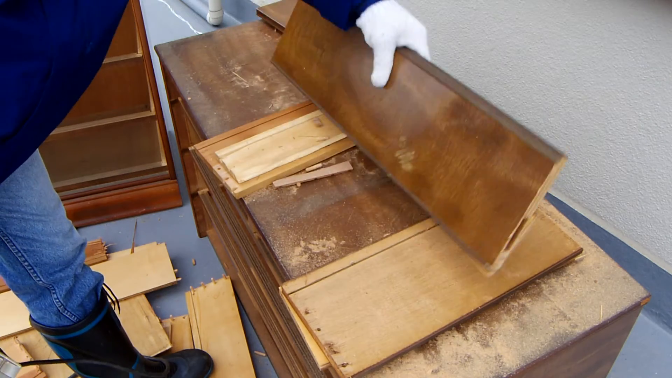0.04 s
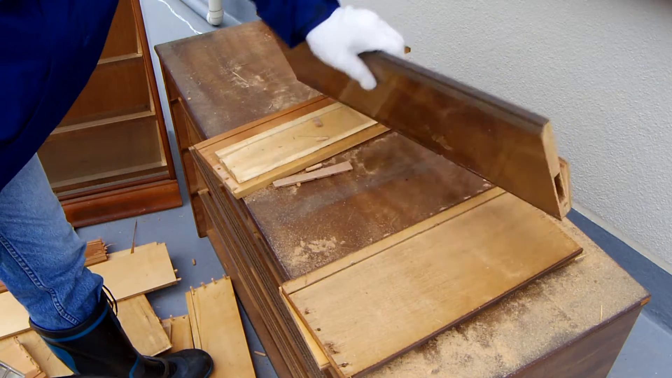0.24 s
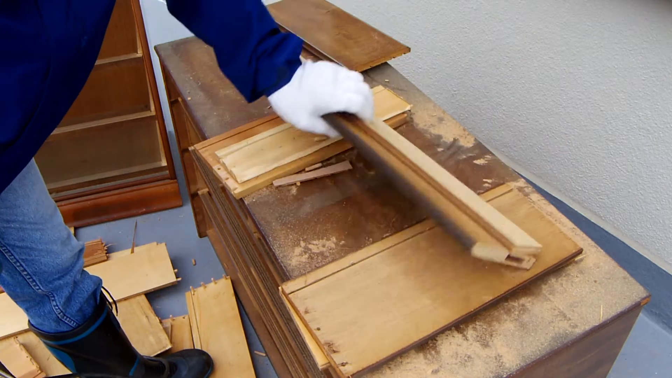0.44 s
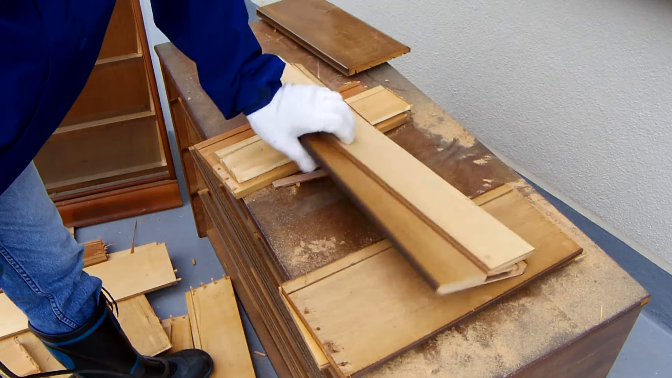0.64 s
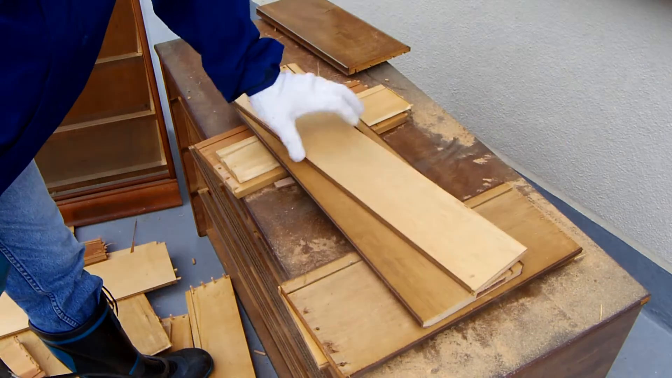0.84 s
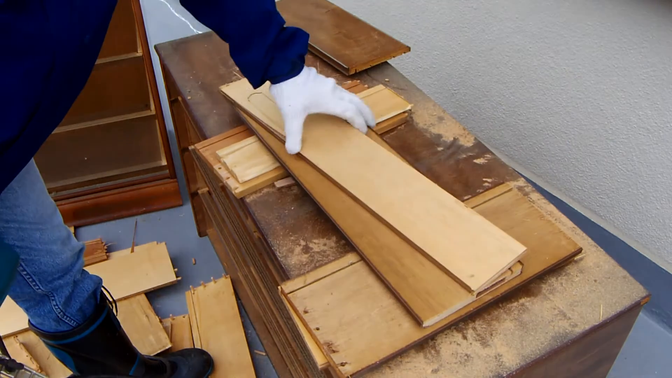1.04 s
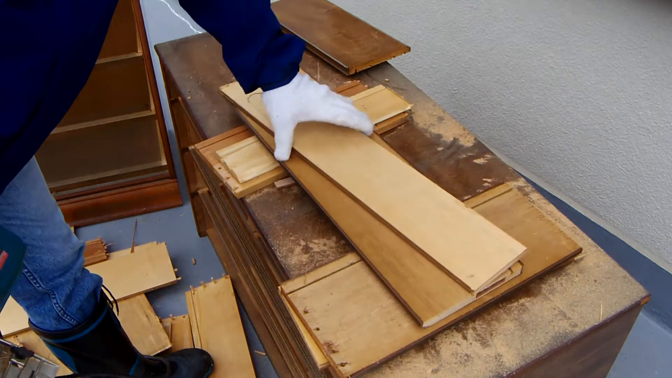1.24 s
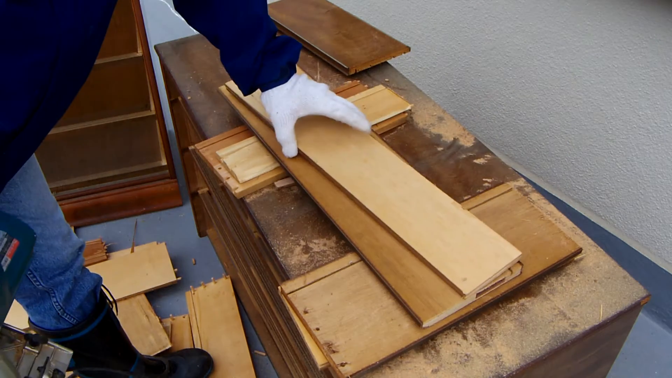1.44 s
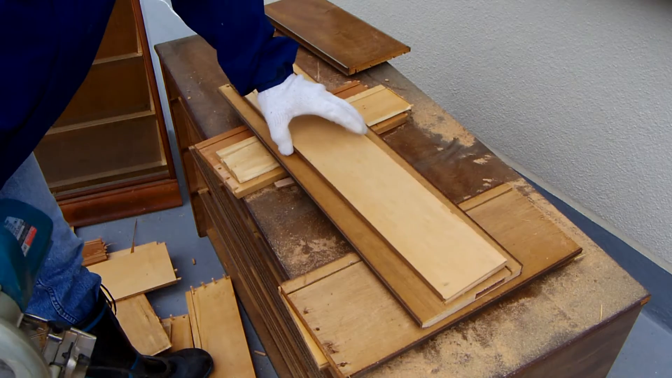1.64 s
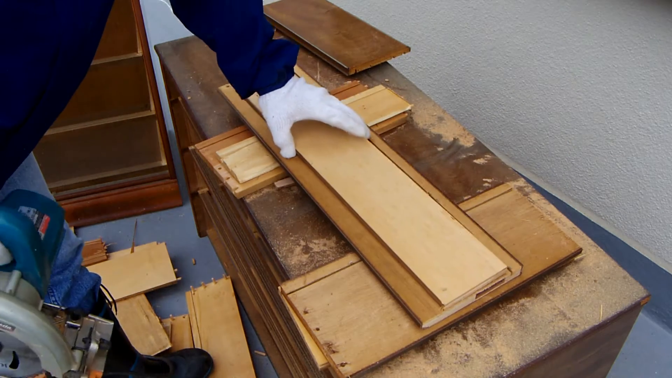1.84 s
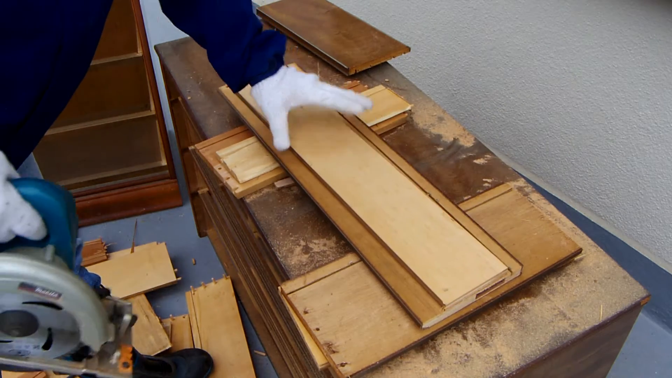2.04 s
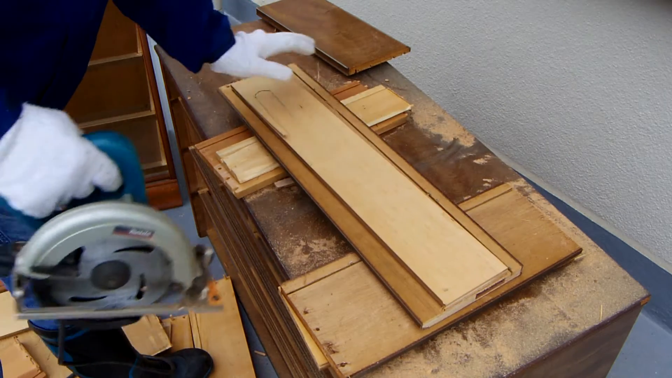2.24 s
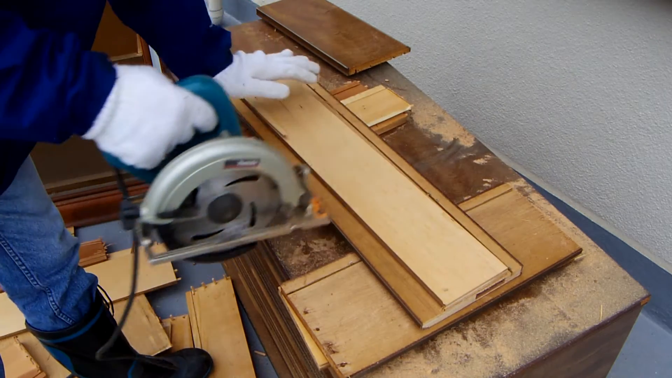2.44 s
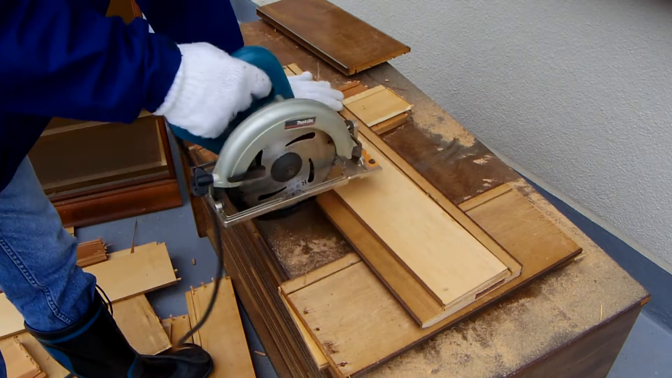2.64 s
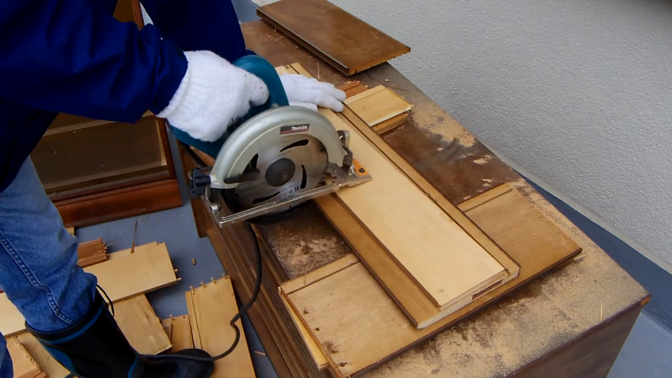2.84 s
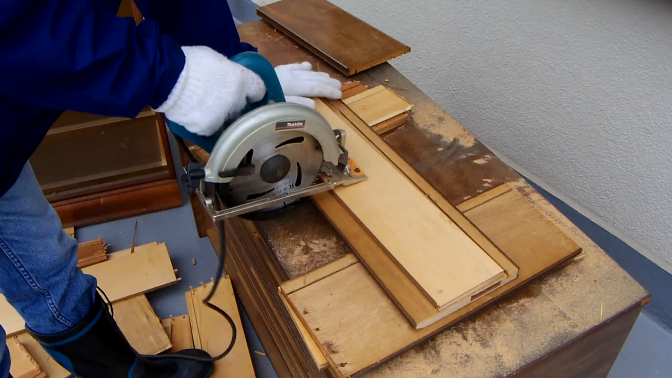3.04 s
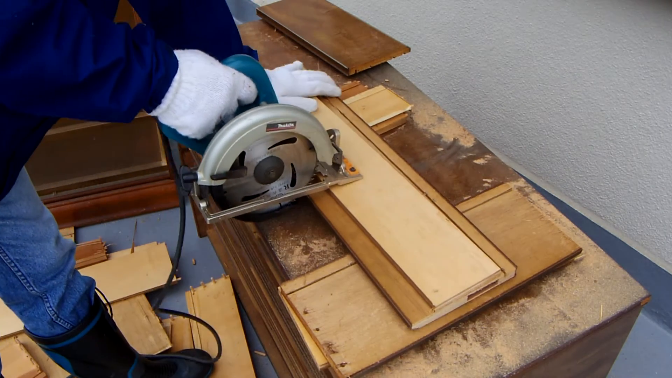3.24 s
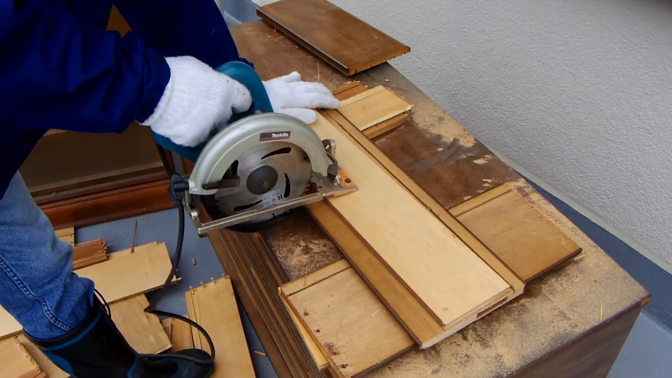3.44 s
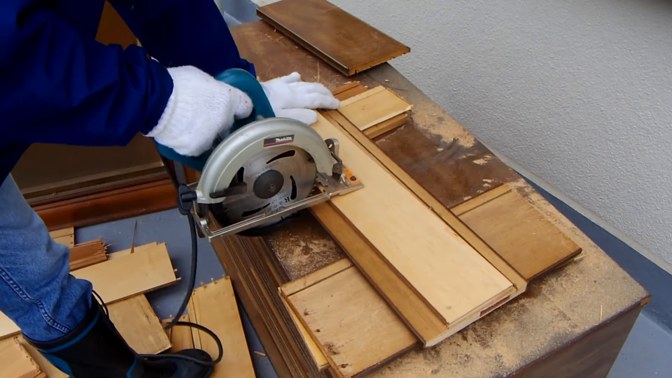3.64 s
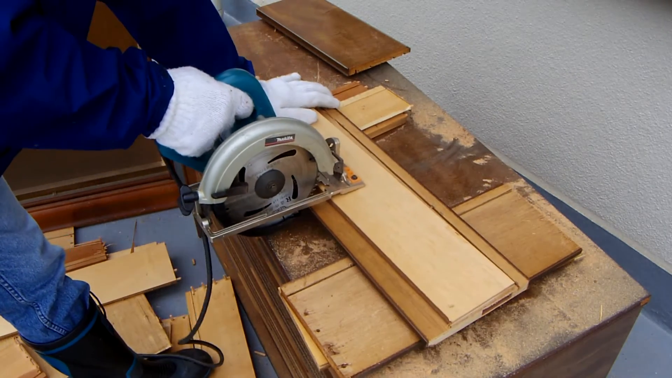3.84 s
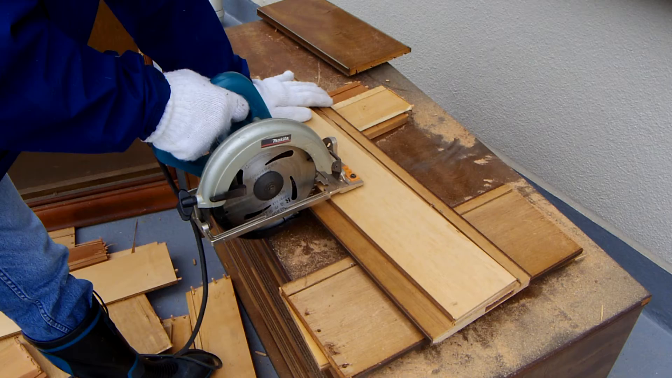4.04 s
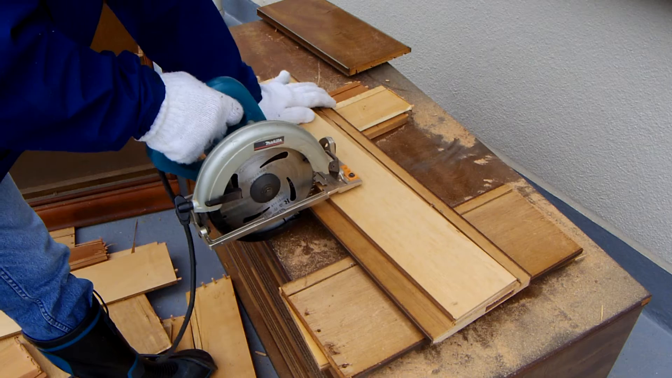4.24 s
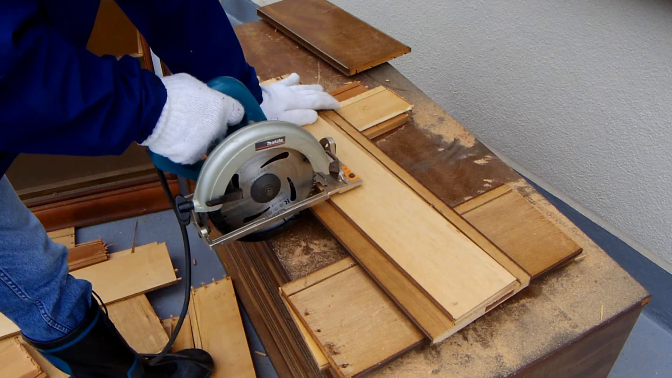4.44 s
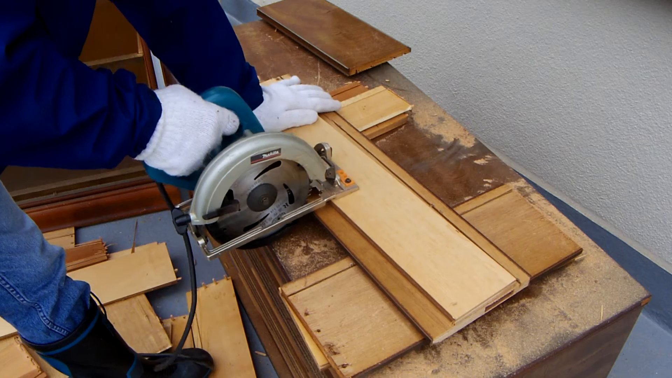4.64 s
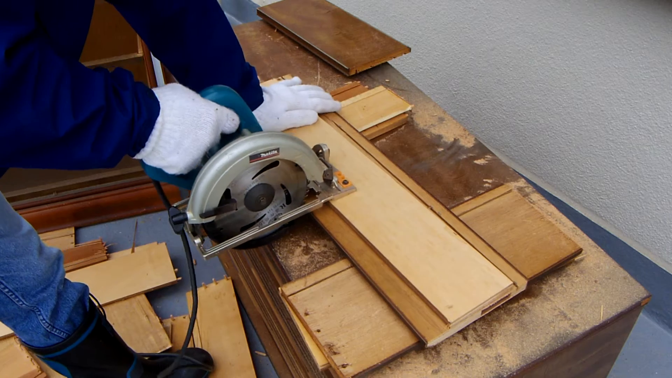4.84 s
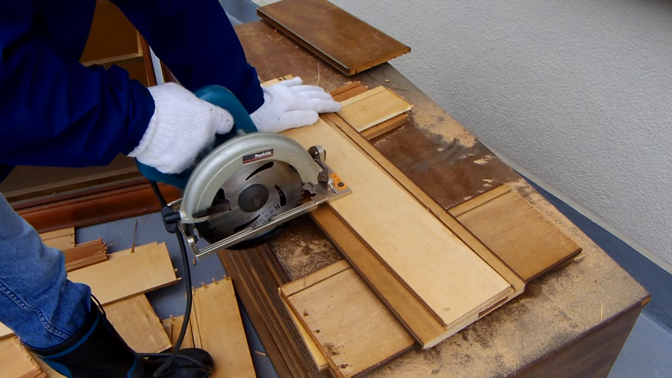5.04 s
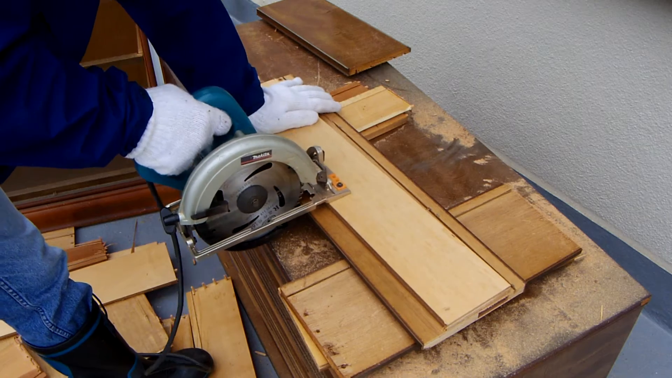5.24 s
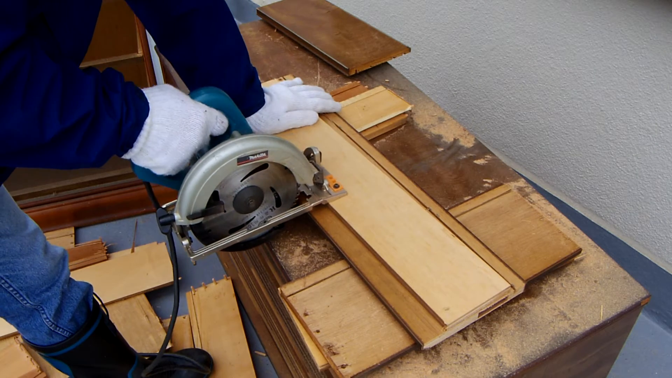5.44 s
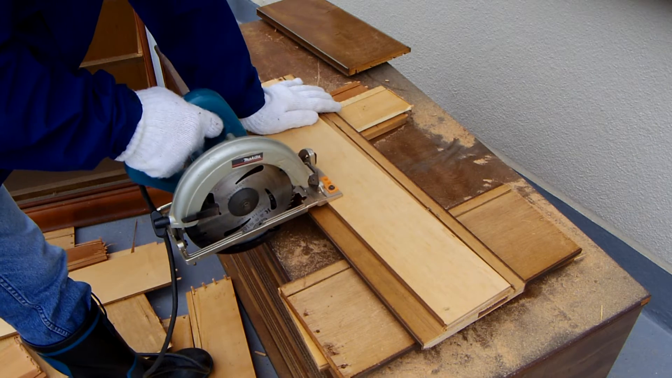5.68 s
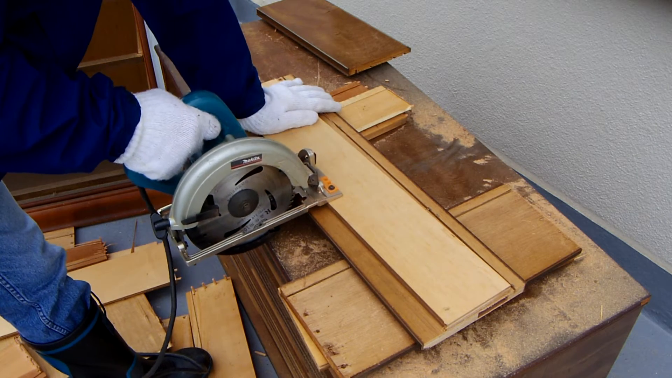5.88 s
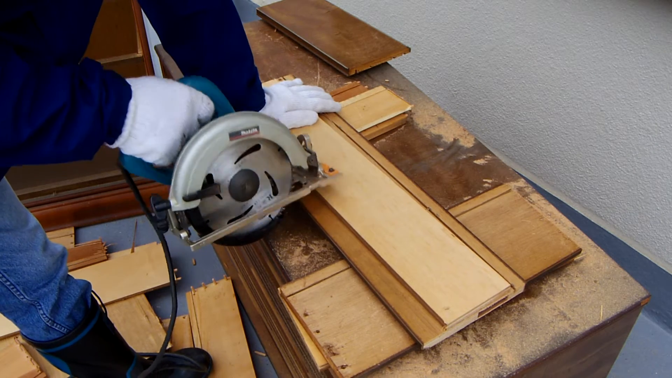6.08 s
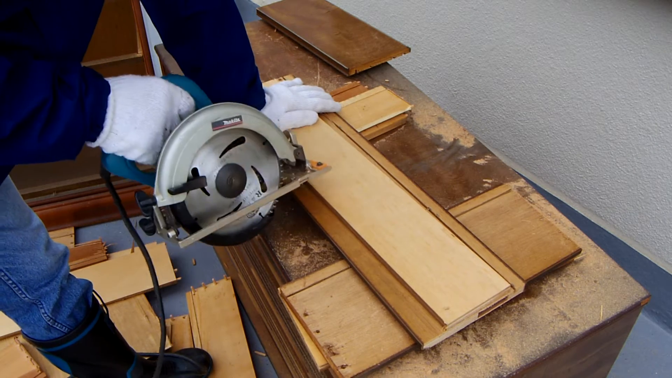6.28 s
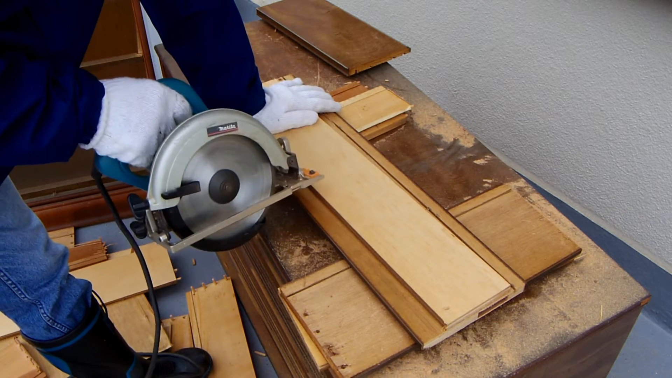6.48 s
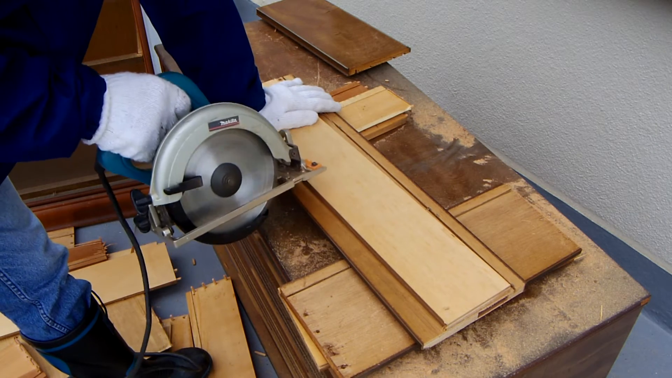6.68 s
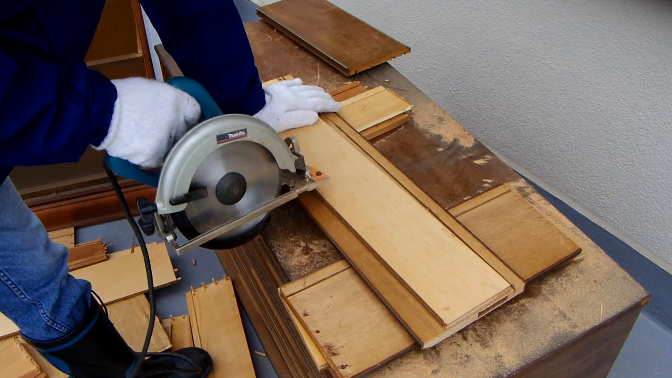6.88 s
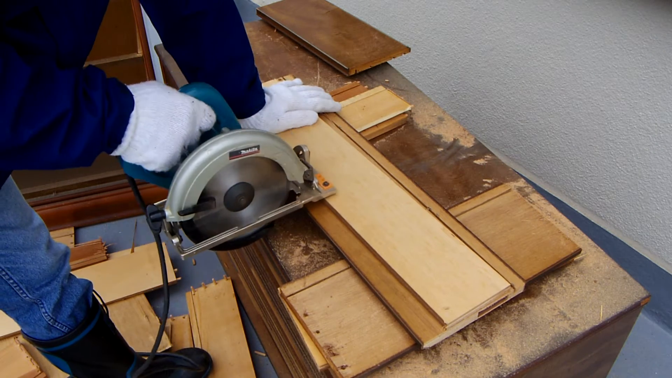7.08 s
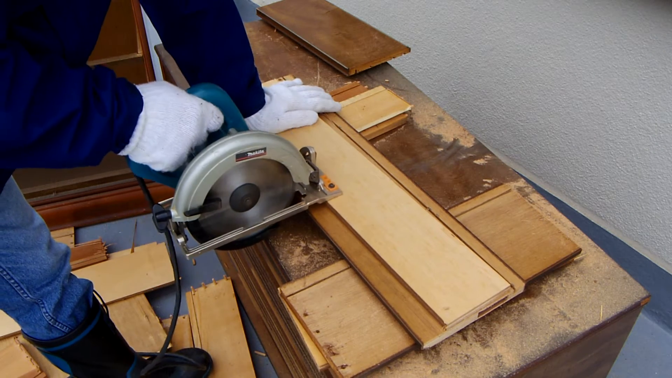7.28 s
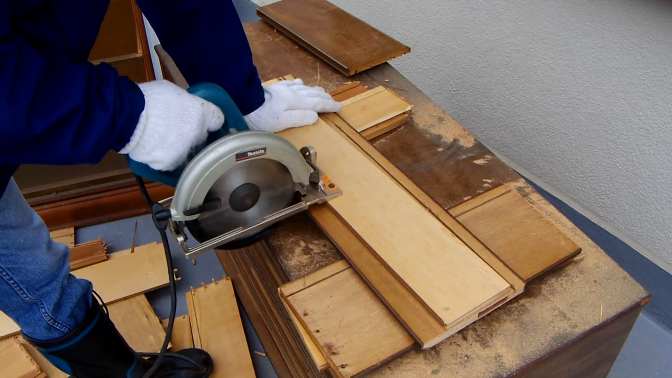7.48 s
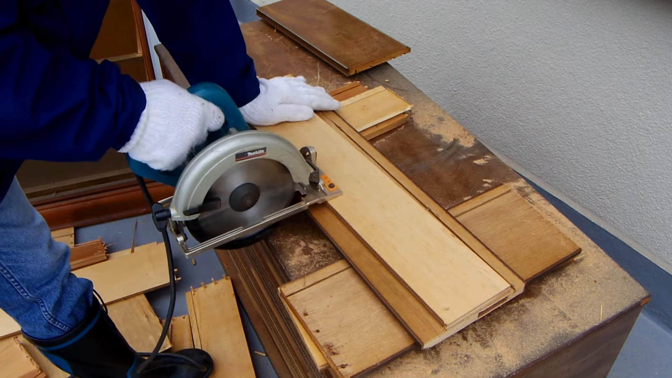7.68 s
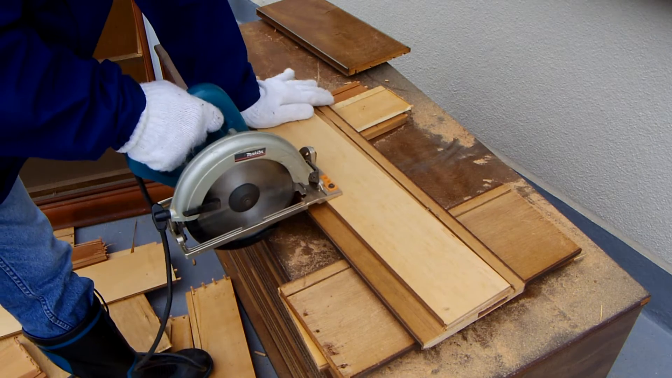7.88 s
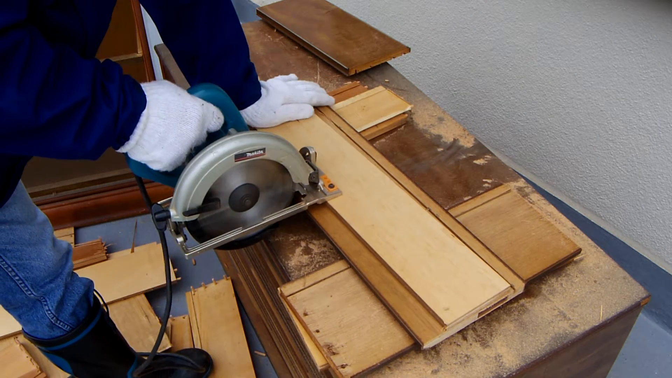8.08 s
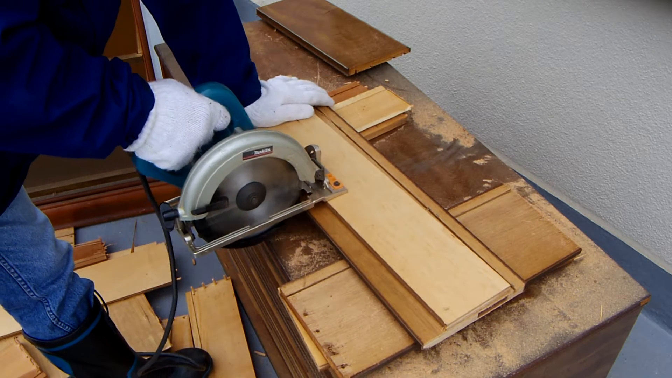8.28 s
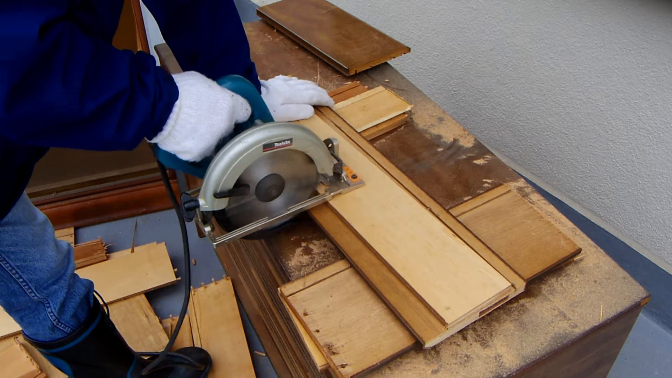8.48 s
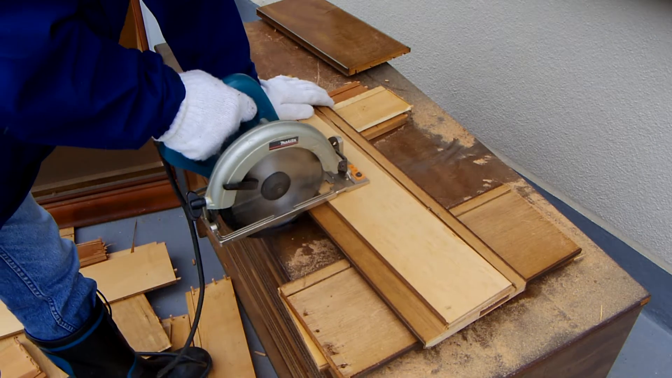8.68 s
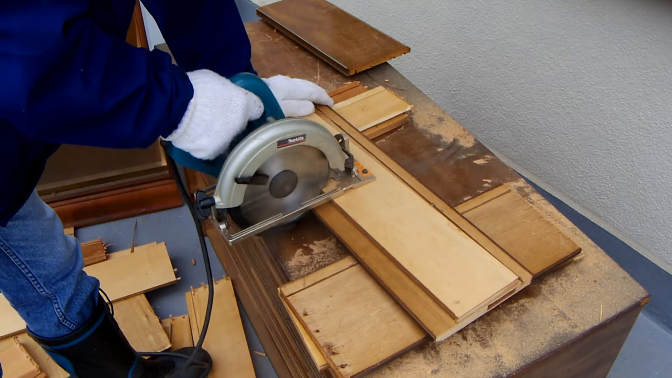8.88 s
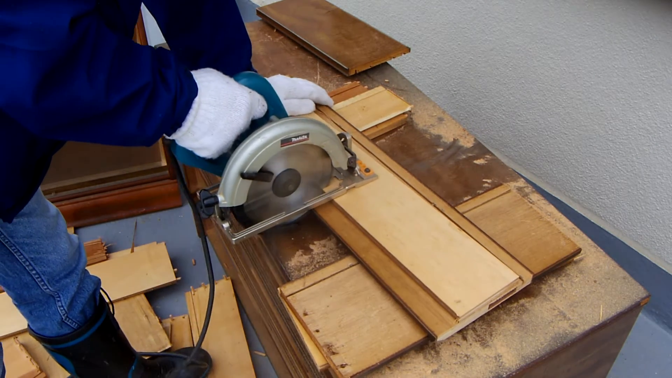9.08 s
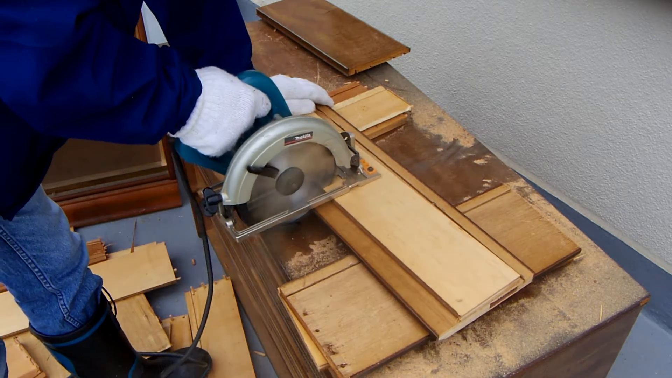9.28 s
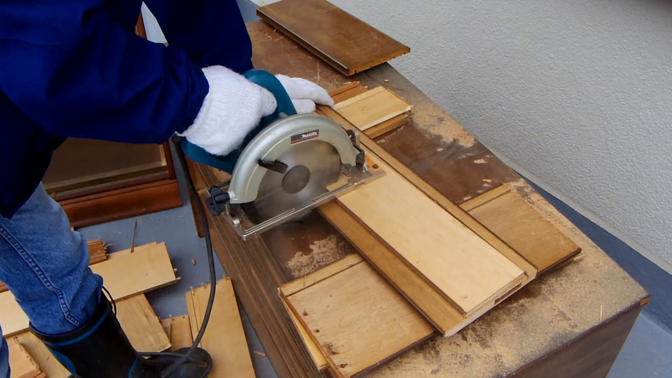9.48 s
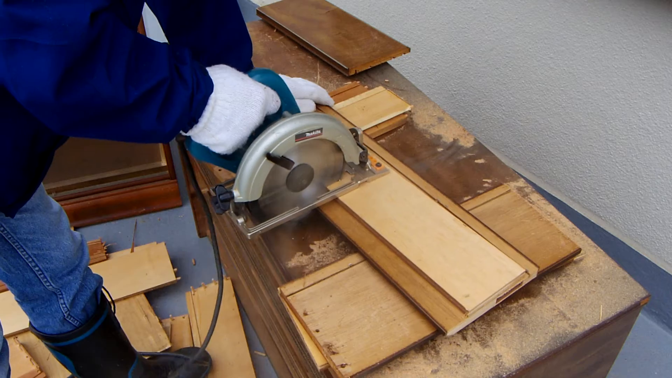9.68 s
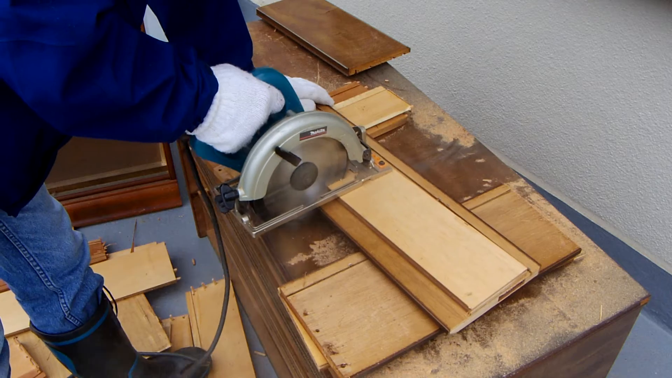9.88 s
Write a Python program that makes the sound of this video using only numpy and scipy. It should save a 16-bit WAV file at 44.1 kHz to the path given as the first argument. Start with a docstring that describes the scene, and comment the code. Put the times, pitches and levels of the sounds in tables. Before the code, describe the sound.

Close by, wood clatters on wood as a board is put down, followed by small taps, brief slides and the clicks of a saw's metal base. Faint traffic and an engine hum come from outside. After a pause, an electric circular saw is briefly triggered, then held, whining up to speed. Its teeth tear into the wood, hissing and buzzing as the blade slows under load. Nearby hard walls add a short echo.

```python
"""Over faint traffic, an engine outside slows down, its exhaust pulses blurred into a hum. A board is
turned over and laid on a wooden cabinet, each impact exciting its modes. Near 3 s the engine pulls away,
while the board and then a hand-held circular saw are slid into place. At 6.5 s the saw is blipped, then
spins up with fan noise and a gear whine tied to its rotation. At 8.5 s its teeth bite, tearing fibres
and ringing the blade, which slows under the load. Hard walls close by add a short echo."""
import sys
import numpy as np
from scipy import signal
from scipy.fft import rfft, irfft
from scipy.io import wavfile

SR = 44100
rng = np.random.default_rng(int(sys.argv[2]) if len(sys.argv) > 2 else 0)


def store_wav(level_fs):
    """Save 16-bit WAV to argv[1]."""
    pcm = np.round(np.clip(np.atleast_2d(level_fs), -1, 1) * 32767)
    wavfile.write(sys.argv[1], SR, pcm.T.astype(np.int16))


N = 437472
T = np.arange(N) / SR
SIDES = np.array([[1], [-1]])  # left, right


def undb(db):
    """Decibels to amplitude ratio."""
    return 10 ** (np.asarray(db) / 20)


def unit(x):
    """Normalisation to rms 1."""
    return x / np.sqrt(np.mean(x ** 2) + 1e-20)


def noise():
    """White Gaussian noise."""
    return rng.standard_normal(N)


def walk(rate):
    """Random modulation of rms 1, with rate new values a second."""
    steps = rng.standard_normal(int(N / SR * rate) + 2)
    return unit(np.interp(T * rate, np.arange(len(steps)), steps))


def sine(cycles):
    """Simple harmonic motion, its phase in cycles."""
    return np.sin(2 * np.pi * cycles)


def curve(points):
    """Linear interpolation of (seconds, value) points at every sample."""
    return np.interp(T, *np.transpose(points))


def onset(start, rise):
    """A linear ramp from 0 to 1, its times in seconds."""
    return np.clip((T - start) / rise, 0, 1)


def along(points, hz):
    """Interpolation of (Hz, value) points on a log-frequency axis."""
    f, value = np.transpose(points)
    return np.interp(np.log(hz + 1), np.log(f), value)


def bins(size):
    """Frequencies of a real Fourier transform."""
    return np.arange(size // 2 + 1) * SR / size


def colour(x, points):
    """Spectral shaping to rms 1, with a steep roll-off beyond the end points."""
    hz = bins(len(x)) + 1
    ends = 1 / np.sqrt((1 + (.8 * points[0][0] / hz) ** 8) * (1 + (.85 * hz / points[-1][0]) ** 12))
    return unit(irfft(rfft(x) * undb(along(points, hz)) * ends, len(x)))


def split(x, hz):
    """A crossover: the parts of x below and above hz."""
    low = signal.sosfiltfilt(signal.butter(4, hz, fs=SR, output="sos"), x)
    return low, x - low


def resonate(x, hz, width):
    """A second-order resonance with gain 1 at its centre."""
    return signal.lfilter(*signal.iirpeak(min(hz, SR / 2 - 100), hz / width, fs=SR), x)


def room(x, wet_db, t60):
    """Reverberation: direct sound plus dense reflections, different at each ear."""
    t = T[:SR // 2]
    decay = undb(-60 * t / t60) + undb(-16.5 - 60 * t / .34)
    tails = rng.standard_normal((2, len(t))) * decay * (t > .002)
    tails /= np.sqrt(np.sum(tails ** 2, axis=1, keepdims=True))
    return x + undb(wet_db) * signal.fftconvolve(x[None], tails, axes=1)[:, :N]


# Spectrum of the background. Each row: frequency in Hz, relative level in dB.
AIR_SPECTRUM = [(180, -23), (300, -1), (502, -9), (842, -5.5), (930, -4), (1030, -7.5), (1750, -12),
                (2610, -18), (7950, -26), (14000, -28.5), (16000, -52)]


def air():
    """Far traffic and hiss form a diffuse field, less coherent between the ears in the treble."""
    mid, side = (colour(noise() * undb(.23 * walk(1.55)), AIR_SPECTRUM) for _ in range(2))
    gain = undb(-68) / np.std(split(mid, 690)[1])
    low, high = split(side, 1600)
    return gain * (mid + SIDES * (.53 * low + 1.12 * high)) * undb(SIDES * -.7)


# Exhaust spectra, throttle shut and open. Each row: frequency in Hz, relative level in dB.
EXHAUST_SPECTRUM = [(25, -7.5), (48, -0.5), (70, 0), (100, -10), (135, -1.5), (175, 0.5), (205, 0),
                    (240, -7), (290, -8), (350, -13), (430, -9.5), (520, -21)]
OPEN_EXHAUST_SPECTRUM = [(100, -13), (150, -8), (200, 4.5), (240, 2.5), (285, -8), (350, -13), (450, -16)]


def exhaust(firings, coasting, pulling):
    """A pulse train gives a harmonic series, here in three rising bands: throb, drone and bark."""
    count = np.floor(np.maximum(firings + .005 * walk(40), 0))
    pulses = unit(np.diff(count, prepend=0) * undb(1.2 * walk(25)))
    pulses = unit(room(pulses, wet_db=2, t60=.07)[0])  # the street smears them into a hum
    low, bark = split(colour(pulses + undb(-9) * noise(), EXHAUST_SPECTRUM), 105)
    throb, drone = split(low, 57)
    open_bark = colour(pulses + undb(-10) * noise(), OPEN_EXHAUST_SPECTRUM)
    bark = unit(bark) * (1 - pulling) + open_bark * pulling
    # each band wavers independently on its way indoors
    lower, rest = split(bark, 185)
    middle, upper = split(rest, 260)
    bark = sum(band * undb(1.7 * walk(9) - .4) for band in (lower, middle))
    return throb, drone, bark + upper * (1 - .4 * coasting) * undb(walk(9))


# Engine speed. Each row: time in seconds, firing rate in Hz.
FIRING_RATE = [(0.0, 40.9), (0.3, 39.7), (1.1, 33.1), (1.6, 31.8), (2.24, 28.0), (2.98, 21.4), (3.17, 23.4),
               (3.4, 29.2), (3.5, 29.6), (4.05, 29.7), (4.22, 30.8), (4.36, 32), (4.96, 34.7), (6.24, 41.9),
               (6.66, 37.7), (8.45, 47.2), (8.76, 47.0), (9.06, 42.2), (9.92, 45.8)]


def engine():
    """The firing rate sets the fundamental and the throttle the level: coasting, pulling, easing off."""
    hz = curve(FIRING_RATE)
    firings = np.cumsum(hz * (1 + .004 * walk(20))) / SR
    pull_s, ease_s = 2.88, 4.24
    opened, eased = onset(pull_s, .45), onset(ease_s, .14)
    coasting, pulling = 1 - opened, opened - eased
    octaves = coasting * np.log2(hz / hz[0])  # negative as the revs sink
    throb, drone, bark = exhaust(firings, coasting, pulling)
    throb_db = -58.5 * coasting - 54.5 * pulling - 55 * eased + .9 * walk(6.2)
    drone_db = -54.5 * coasting - 56.5 * pulling - 68.5 * eased + .9 * walk(6.2) + 8.4 * octaves
    bark_db = -56 * coasting - 51.5 * pulling - 55 * eased + .9 * walk(6.2) + 10 * octaves
    bark_db -= 1.67 * np.maximum(T - ease_s, 0)  # it draws away
    boom = sine(4 * firings + (.03 - .2 * octaves) * walk(30))  # the exhaust's fourth harmonic
    boom *= coasting * undb(-48.5 + 16.5 * octaves + 2.6 * walk(8.74))
    bass = unit(throb) * undb(throb_db - 2.6 * SIDES) + unit(drone) * undb(drone_db - 1.8 * SIDES)
    return bass + (boom + bark * undb(bark_db) + rattle(firings) * pulling) * undb(SIDES * -1.1)


def impacts(events, spectrum, modes, t60, damping_slope, rise_s, ring_db, gain_db):
    """An impulse excites damped modes over a noisy crack whose treble dies first; t60 holds at 1 kHz."""
    out, t = np.zeros(N + SR), T[:SR // 3]
    hz = bins(len(t))
    for start, db, tilt, pitch in events:
        crack = ring = 0
        for centre in 125 * 2. ** np.arange(8):
            band = np.cos(np.clip(np.log2((hz + 1) / centre), -1, 1) * np.pi / 2)
            gain = band * undb(along(spectrum, hz / pitch) + tilt * np.log2(centre / 1000))
            life = t60 * (centre / 1000) ** -damping_slope
            phases = np.exp(2j * np.pi * rng.random(len(hz)))
            crack += irfft(gain * phases, len(t)) * undb(-60 * t / life)
        for f, mode_db, life in modes:
            envelope = undb(mode_db + tilt * np.log2(f / 1000) - 60 * t / life)
            ring += envelope * sine(f * pitch * t) * rng.choice([-1, 1])
        hit = (unit(crack) + undb(ring_db) * unit(ring)) * np.minimum(t / rise_s, 1)
        i = int(start * SR)
        out[i:i + len(t)] += hit * undb(db + gain_db) / np.std(hit[:SR // 200])
    return out[:N]


# Blows on the board. Each row: start in seconds, relative level in dB, tilt in dB/octave, pitch ratio.
BOARD_KNOCKS = [(0.0988, -32.5, 6.5, 0.89), (0.387, -38, -2.5, 1), (0.401, -44, 7, 1.06),
                (0.476, -35.5, 0, 1.1), (0.496, -36, 0.5, 1.54), (0.575, -16, 0, 1.54),
                (0.578, -13.5, 2, 0.96), (0.607, -42, 14, 1), (0.625, -46, 12, 1), (0.641, -31, -0.5, 0.94),
                (0.665, -30.5, -4, 1.1), (0.89, -26.5, 2.5, 1.1), (0.897, -9.5, 2, 0.98),
                (0.96, -23.5, 5, 0.77), (0.988, -18.5, 2, 1.01), (1.0424, -51, 7, 0.89), (1.312, -51, 4, 1),
                (1.438, -55.5, 7, 1), (1.656, -52, 4, 1.4), (2.55, -66, 11, 0.9), (2.947, -25.5, 0, 1.74),
                (3.024, -35.5, -0.5, 1), (3.1475, -44, 3, 1), (3.1659, -42.5, 6.5, 0.97),
                (3.192, -54, 0, 1.1), (3.208, -57, 1, 0.92), (3.3204, -45, 4.5, 0.93), (3.545, -45, 2, 1),
                (3.6081, -29.5, 7, 1.08), (3.624, -31, -7, 0.92), (3.743, -43, 3.5, 1.6),
                (3.7599, -43.5, 4.5, 1.3)]
# Spectrum of a knock. Each row: frequency in Hz, relative level in dB.
KNOCK_SPECTRUM = [(59, -35), (100, -6), (147, -11), (277, -13.5), (558, 0), (662, -9), (801, -3.5),
                  (1100, -7), (1350, -10), (1900, -8), (2250, -11), (2990, -21), (4110, -17.5), (4570, -25),
                  (12700, -34), (16000, -51)]
# Modes of the board. Each row: frequency in Hz, relative level in dB, 60 dB decay time in seconds.
WOOD_MODES = [(143, -16, 0.21), (315, -8, 0.37), (490, -11, 0.27), (580, 0.5, 0.12), (784, -15, 0.13),
              (957, -3, 0.069), (1230, -25, 0.12), (1346, -3.5, 0.06), (1635, -4, 0.05), (1964, -11, 0.055),
              (2370, -21, 0.12), (2750, -18, 0.095), (3467, -34, 0.16), (4080, -12, 0.12)]


def board_knocks():
    """Free vibration of struck wood, its pitch depending on the spot struck."""
    return impacts(BOARD_KNOCKS, KNOCK_SPECTRUM, WOOD_MODES,
                   t60=.091, damping_slope=.56, rise_s=.00048, ring_db=-14, gain_db=-10)


# Resonances of thin metal. Each row: frequency in Hz, bandwidth in Hz, relative gain in dB.
THIN_METAL = [(1780, 1600, 11), (2780, 360, -9), (3220, 160, -5), (4300, 200, 7.5), (6370, 300, -2),
              (7260, 900, 0), (11600, 970, -11)]


def thin_metal(force):
    """Modal superposition: thin metal answers a force with the sum of its resonances."""
    return unit(sum(undb(db) * resonate(force, hz, width) for hz, width, db in THIN_METAL))


def rattle(firings):
    """Forced vibration: each firing shakes a burst of ticks out of loose metal."""
    phase = firings % 1
    burst = np.minimum(phase / .15, 1) * np.exp(-phase / .27)
    return thin_metal(noise() * burst * undb(walk(30) + 2.2 * walk(600))) * undb(-68.5)


# Metal clicks. Each row: start in seconds, relative level in dB, tilt in dB/octave, pitch ratio.
SHOE_CLICKS = [(2.9462, -23.5, 3, 0.9), (4.359, -15, 1, 1.01), (4.7551, -29, -1.5, 0.97),
               (4.8224, -37.5, -5.5, 1), (4.8743, -41, -9.5, 1.3)]
# Spectrum of a click. Each row: frequency in Hz, relative level in dB.
CLICK_SPECTRUM = [(350, -35), (600, -21), (2400, -11), (2800, -12), (3730, -8), (4520, -8), (5630, -15),
                  (7620, 1), (8740, -4), (16000, -6.5)]
# Modes of the shoe. Each row: frequency in Hz, relative level in dB, 60 dB decay time in seconds.
METAL_MODES = [(1590, -6, 0.1), (2557, -28, 0.099), (2800, 4, 0.061), (4430, 3, 0.062), (5394, -23, 0.062),
               (6150, 9, 0.025), (6500, -31.5, 0.096), (7300, -44, 0.087), (9281, -41.5, 0.12),
               (10300, -22, 0.049), (10370, 6, 0.044), (14000, -11, 0.046)]


def shoe_clicks():
    """Free vibration of the saw's metal shoe and guard: high, quickly damped modes."""
    return impacts(SHOE_CLICKS, CLICK_SPECTRUM, METAL_MODES,
                   t60=.03, damping_slope=.36, rise_s=.0021, ring_db=-11.5, gain_db=-17)


# Sliding strokes. Each row: start in seconds, end in seconds, relative level in dB.
STROKES = [(3.45, 3.6, -69.5), (3.8, 4.154, -73), (4.94, 5.078, -75.5)]
# Spectrum of rubbing. Each row: frequency in Hz, relative level in dB.
RUB_SPECTRUM = [(880, -34.5), (1500, -22), (1670, -4), (2970, -3), (4420, -5), (11800, -1), (16000, -19)]


def slides():
    """Friction makes gritty noise as the board, then the shoe, slides into place."""
    strokes = sum(undb(db) * (onset(start, .065) - onset(end, .065)) for start, end, db in STROKES)
    grit = noise() * undb(3 * walk(500) + 1.5 * walk(40))
    return (undb(1.5) * colour(grit, RUB_SPECTRUM) + undb(-4) * thin_metal(grit)) * strokes


# The trigger, blipped and then held. Each row: press in seconds, release in seconds.
PRESSES = [(6.498, 6.688), (6.81, 10)]
# The blade under load. Each row: time in seconds, speed in turns per second.
CUTTING_SPEED = [(8.56, 71.6), (8.608, 70.7), (8.71, 66.7), (8.874, 64.9), (9.176, 57.9), (9.378, 56.9),
                 (9.518, 53.4), (9.92, 52.9)]
FREE_SPEED = 72.3  # turns per second
SWITCH_ON_S, BITE_S = PRESSES[0][0], 8.546


def blade_speed():
    """Rotational inertia: the blade nears its free speed gradually; brake or wood drags it down."""
    spin_up_s, brake_s, stall_torque = .472, .12, 1.7
    speed = np.zeros(N)
    for on, off in PRESSES:
        deficit = 1 - np.interp(on, T, speed) / FREE_SPEED
        fade = np.exp(-np.clip(T - on, 0, off - on) / spin_up_s)
        driven = FREE_SPEED * (1 - deficit * fade / (1 + stall_torque * deficit * (1 - fade)))
        speed = np.where(T < on, speed, driven * np.exp(-np.maximum(T - off, 0) / brake_s))
    return np.where(T < BITE_S, speed, curve(CUTTING_SPEED))


# Spectrum of the fan. Each row: frequency in Hz, relative level in dB.
FAN_SPECTRUM = [(88, -64), (150, -68), (275, -7), (391, -18), (555, -7.5), (637, -16.5), (837, -8),
                (1260, -10.5), (2020, -2), (2920, -7), (3220, -4), (4760, -13), (6020, -8), (12900, -9.5),
                (16000, -24.5)]


def fan(revs, current):
    """Turbulence gives broadband noise, its treble weaker near standstill or with the current off."""
    low, high = split(colour(noise(), FAN_SPECTRUM), 7250)
    treble_gain = undb(-1 - 4 * (1 - current)) * np.minimum(revs / .21, 1)
    return unit(low) * undb(-3.5) + unit(high) * treble_gain


def whistle(cycles, order, width_hz):
    """Narrow-band noise: random quadrature modulation of a carrier of phase order * cycles."""
    angle = 2 * np.pi * order * cycles
    return walk(width_hz) * np.cos(angle) + walk(width_hz) * np.sin(angle)


# Air whistles. Each row: order (multiple of blade speed), width in free speeds, relative level in dB.
AIR_WHISTLES = [(29.1, 7, -21), (146, 16, -9), (180, 10, -18)]


def whistling_air(turns):
    """Aerodynamic noise in bands whose pitch is proportional to the blade speed."""
    return sum(undb(db) * whistle(turns, order, width * FREE_SPEED) for order, width, db in AIR_WHISTLES)


# Motor tones that drive the free blade. Each row: order, relative level in dB.
DRIVING_TONES = [(197, -10), (156.7, -2), (117.5, -14), (94, -15)]


def blade_ring(speed):
    """Resonance: the accelerating blade rings softly, and surges as a tone sweeps through its mode."""
    mode_hz, width_hz, catch_hz = 6150, 260, 190
    surge = sum(undb(db) / (1 + ((order * speed - mode_hz) / catch_hz) ** 2)
                for order, db in DRIVING_TONES)
    soft = undb(-11) * np.clip(2 * (1 - speed / FREE_SPEED), 0, 1)
    mode = unit(resonate(resonate(noise(), mode_hz, width_hz), mode_hz, width_hz))
    return (soft + surge) * mode * (1 - onset(7.7, .2))


# Whine tones. Each entry: order; 47 is the gear mesh, 60 the teeth, fractions come from the armature.
TONE_ORDERS = [4, 8, 47 * 2 / 9, 12, 16, 24, 46, 47, 49, 50, 60, 47 * 12 / 9, 64, 47 * 30 / 9]
# Their strengths. Each entry: relative level in dB.
TONE_DB = [-24, -23, -25, -19, -25, -22, -12, -11, -23, -21, -14, -25, -24, -14]


def gear_whine(turns, revs):
    """Periodic meshing gives tones locked to the rotation; backlash modulates their phase."""
    flutter = turns + .0004 * walk(45) + .0006 * walk(350)
    whine = sum(undb(db + 1.2 * walk(18)) * np.sqrt(2) * sine(order * flutter + rng.random())
                for order, db in zip(TONE_ORDERS, TONE_DB))
    meshed = revs ** 2 * (.45 + .55 * onset(7.38, .2))  # firms up as the speed settles
    slack_db = -6 * np.maximum(T - 8.1, 0)  # eases once the gears run slack
    return whine * meshed * undb(slack_db + 1.5 * walk(200))


# Armature tones. Each row: order, phase jitter in cycles, relative level in dB.
SLOT_TONES = [(31.3, .2, -10), (47, .14, -3.5), (62.7, .16, -2.5), (78.3, .26, -14), (94, .22, -10)]


def armature_growl(turns, revs):
    """Under acceleration, rough slot tones flare up as they cross the blade's resonances."""
    growl = sum(undb(db) * unit(sine(order * turns + jitter * walk(260)) * undb(2.2 * walk(70)))
                for order, jitter, db in SLOT_TONES)
    flare = undb(6) * resonate(growl, 2660, 170) * onset(7.05, .1) + undb(2) * resonate(growl, 3380, 280)
    strain = np.clip(np.minimum((revs - .1) / .22, (.95 - revs) / .25), 0, 1)
    return (growl + flare) * strain * undb(-10 + 3.6 * walk(50))


def brake_squeal(turns):
    """The gears squeal as the brake catches, with exponential decay."""
    brake = sum(onset(off - .01, .01) * np.exp(-np.maximum(T - off, 0) / .039) for _, off in PRESSES)
    return undb(-1) * brake * (whistle(turns, 60, 200) + .6 * whistle(turns, 100, 900))


# Resonances of the blade guard. Each row: frequency in Hz, bandwidth in Hz, gain in dB.
GUARD_RESONANCES = [(8100, 500, 1), (8950, 500, 2), (10300, 600, 0), (12750, 600, 5)]


def high_motor_whistle(turns, revs):
    """High motor whistles rise with speed, swelling as they sweep through resonances."""
    bands = (.85 * whistle(turns, 196, 520) + .7 * whistle(turns, 187, 800)) * undb(2 * walk(25))
    bands *= onset(6.9, .06) - .75 * onset(7.42, .25)
    bands += .8 * whistle(turns, 148, 600) * (onset(7.1, .08) - onset(7.38, .1))
    guard = sum(undb(db) * resonate(bands, hz, width) for hz, width, db in GUARD_RESONANCES)
    return undb(-13) * (bands + guard) + undb(-12) * whistle(turns, 156.7, 70) * revs ** 4


def motor(speed, turns):
    """Rotating machinery: air noise and tones superpose, louder with speed and with the current on."""
    revs = np.minimum(speed / FREE_SPEED, 1)
    current = sum(onset(on, .002) - onset(off, .04) for on, off in PRESSES)
    db = -34.5 - 17 * (1 - revs) - 3.5 * (1 - current)
    rush = fan(revs, current) + revs * whistling_air(turns) + high_motor_whistle(turns, revs)
    tones = gear_whine(turns, revs) + current * armature_growl(turns, revs) + brake_squeal(turns)
    housing = .5 * resonate(tones, 3190, 180)
    return (rush + tones + housing + blade_ring(speed)) * undb(db) * onset(SWITCH_ON_S, .002)


TEETH = 60


def tooth_strikes(turns):
    """An impulse train of uneven bites, dispersed as bending waves carry treble faster than bass."""
    passed = turns * TEETH
    strike = np.arange(1, int(passed[-1]))
    tooth_db = 2.4 * unit(rng.standard_normal(TEETH))  # repeats every turn
    grain_db = 2.2 * rng.standard_normal(len(strike))
    size = undb(tooth_db[strike % TEETH] + grain_db)
    size -= size.mean()
    place = np.interp(strike, passed, np.arange(N))
    i, part = place.astype(int), place % 1
    pulses = (np.bincount(i, size * (1 - part), N + 1) + np.bincount(i + 1, size * part, N + 1))[:N]
    pulses /= np.std(pulses[T > BITE_S])
    delay_s = .006  # at 1 kHz
    return irfft(rfft(pulses) * np.exp(-4j * np.pi * delay_s * np.sqrt(1000 * bins(N))), N)


def tooth_note(turns):
    """The tooth-passing tone and its harmonics: grain shakes their phase, grab and slip their level."""
    def grab():
        return unit(undb(2.2 * walk(25) + 2.6 * walk(170)) * (1 + .5 * sine(turns)))
    phase = TEETH * turns + .095 * walk(220) + .04 * walk(1100)
    # the note leads at the first bite, its overtones deeper in the wood
    note = grab() * sine(phase) * (1.2 - .52 * onset(8.68, .22))
    overtones = grab() * (undb(-11) * sine(2 * phase) + undb(-18) * sine(3 * phase))
    return note, overtones * (.5 + .6 * onset(8.85, .1) - .5 * onset(9.35, .15))


# Splinters snapping off. Each row: time in seconds, level in dB relative to the crackle.
SPLINTERS = [(8.553, -7), (8.76, 10), (8.777, 6), (8.839, 14), (9.13, 5), (9.304, 10)]


def tearing_fibres(turns):
    """Fracture noise, amplitude-modulated once per turn and once per tooth."""
    crackle = unit(noise() * undb(2.6 * walk(3000)))
    crackle *= (1 + .12 * sine(turns)) * (1 + .51 * np.cos(2 * np.pi * TEETH * turns))
    return crackle + sum(undb(db) * noise() * np.exp(-np.abs(T - s) / .00041) for s, db in SPLINTERS)


# Modes of the blade in the cut. Each row: frequency in Hz, bandwidth in Hz, relative gain in dB.
BLADE_MODES = [(2690, 24, 1), (3004, 39, 4), (3230, 39, -12), (3440, 81, -7), (4190, 110, -1),
               (5260, 32, 10.5), (5510, 70, 3.5), (5700, 80, 4.5), (6320, 110, 2.5), (6820, 150, 6),
               (7340, 180, 3.5), (8600, 76, 2), (10270, 100, -2), (11480, 210, 9), (12100, 160, 0),
               (12900, 260, 8)]
# Spectrum of tearing. Each row: frequency in Hz, relative level in dB.
TEAR_SPECTRUM = [(1180, -59), (2000, -27), (2240, -14.5), (2670, -14), (3340, -22), (3940, -6.5),
                 (4300, -12), (4600, -14), (4950, -9.5), (5450, -3), (8120, 1), (10000, 6.5), (12700, 5),
                 (15500, 3), (16000, -20)]


def cutting_noise(force):
    """The cutting force hisses and excites the blade's modes, which swell and fade as the kerf pinches."""
    blade = sum(undb(db + 2.5 * walk(9)) * resonate(force, hz, width) for hz, width, db in BLADE_MODES)
    return unit(colour(force, TEAR_SPECTRUM) + undb(-10.5) * unit(blade))


# Frequency response of the board. Each row: frequency in Hz, relative gain in dB.
BOARD_RESPONSE = [(71, -21), (155, -11), (230, -17), (320, -9), (397, -17.5), (463, -11.5), (680, -12.5),
                  (882, -9), (1400, -11), (1980, -5.5), (2250, -13), (2660, -6.5), (3910, -4.5),
                  (4700, -13), (6110, -33), (10300, -120)]
# Hum of the loaded blade. Each entry: order.
HUM_ORDERS = [8, 10, 12, 14, 16, 17, 30]
# Their strengths. Each entry: relative level in dB.
HUM_DB = [-24, -29, -24.5, -22.5, -26, -28, -24]


def board_buzz(speed, turns, strikes, fibres):
    """Forced vibration: the board buzzes and hums, driven more firmly as the blade sinks in."""
    depth = .64 + .53 * onset(8.7, 1)
    buzz = colour(depth * strikes + undb(-10) * fibres, BOARD_RESPONSE)
    buzz /= np.std(buzz[T > BITE_S])
    hum = 0
    for order, db in zip(HUM_ORDERS, HUM_DB):
        gain = undb(db + along(BOARD_RESPONSE, order * speed) + 3.5 * walk(9))
        hum += gain * sine(order * turns + .07 * walk(110) + rng.random())
    return undb(-17) * buzz + undb(4) * depth * hum


# Squeals. Each row: start in seconds, end in seconds, frequency in Hz, relative level in dB.
PINCHES = [(8.55, 8.8, 10310, -13.5), (8.55, 8.74, 2680, -17), (8.56, 8.6, 1800, -20),
           (8.96, 9.09, 5690, -16), (9.08, 9.14, 4010, -16), (9.38, 9.57, 10170, -13)]


def blade_squeals():
    """Friction in the pinching kerf briefly excites single modes of the blade."""
    return sum(undb(db) * (onset(start, .03) - onset(end, .03)) * whistle(T, hz, 60)
               for start, end, hz, db in PINCHES)


# How hard the saw is fed. Each row: time in seconds, relative level of the cut in dB.
FEED_LEVEL = [(8.57, -18.5), (8.654, -20.5), (8.698, -17), (8.83, -19), (9.04, -19), (9.11, -22),
              (9.35, -22.5), (9.55, -20.5), (9.658, -21), (9.728, -23), (9.9, -22)]


def cut(speed, turns):
    """Impact and fracture excite blade and board together, at a level set by the feed."""
    strikes, fibres = tooth_strikes(turns), tearing_fibres(turns)
    note, overtones = tooth_note(turns)
    rasp, tear = split(cutting_noise(fibres + undb(-2) * strikes + overtones), 4700)
    sinking_db = -4.5 * np.maximum(T - BITE_S, 0)  # rasp and note fade as the blade sinks in
    bite = (undb(-13) * unit(rasp) + undb(-12.8) * note) * undb(sinking_db)
    sound = undb(.5) * tear + bite + board_buzz(speed, turns, strikes, fibres) + blade_squeals()
    t = T - 8.767  # the blade grabs and lets go as it enters
    chatter_db = 1.5 * np.cos(2 * np.pi * 12 * t) * np.exp(-(t / .1) ** 2)
    return sound * undb(curve(FEED_LEVEL) + chatter_db + .16 * walk(35)) * onset(BITE_S, .008)


# Left-right level offsets. Each row: frequency in Hz, left minus right in dB.
SIDE_LEVEL = [(60, -2), (110, -2), (200, -4), (380, -1.5), (700, -2), (1290, -1.5), (2380, -0.5),
              (4400, -2.5), (8120, -3.5), (15000, 2)]
# Left-right phase offsets that widen the saw's sound; irregular above 8 kHz, not a position cue.
# Each row: frequency in Hz, lead of the left in radians.
SIDE_PHASE = [(0, 0), (3620, 0), (4220, 1.04), (5170, 1.1), (5940, 0.0026), (7240, 1.23), (8530, 0.84),
              (9470, 1.58), (10900, 1.1), (11200, 1.8), (11800, 1.65), (12200, 0.76), (14300, 1.7),
              (16600, 0.068)]


def saw():
    """Motor and cut, widened by reflections and by left-right offsets of level and phase."""
    speed = blade_speed()
    turns = np.cumsum(speed) / SR
    direct = motor(speed, turns) + cut(speed, turns) * undb(.96)
    # the spinning plate scatters its treble differently towards each side
    treble = split(direct, 3100)[1]
    scatter = np.array([np.roll(treble, int(lag * SR)) * np.cos(np.pi * walk(50))
                        for lag in (.0031, .0047)])
    scatter *= undb(-2) * onset(SWITCH_ON_S, .002)
    left, right = rfft(room(direct, wet_db=-10, t60=.09) + scatter)
    hz = bins(N)
    side = (left - right) / 2 * hz / np.hypot(hz, 900)  # long waves reach both sides alike
    spectra = (left + right) / 2 + SIDES * side
    offsets = undb(SIDES * along(SIDE_LEVEL, hz) / 2) * np.exp(1j * SIDES * along(SIDE_PHASE, hz) / 2)
    return irfft(spectra * offsets, N) * onset(SWITCH_ON_S, .001)


def scene():
    """Superposition of the handling with its echo, the saw, the engine and the background."""
    handling = room(board_knocks() + shoe_clicks() + slides(), wet_db=-7.5, t60=.06)
    return handling * undb(SIDES * -1.1) + saw() + engine() + air()


def record(dry):
    """Soft saturation rounds the highest peaks; a low-pass filter cuts the top of the treble."""
    return signal.sosfilt(signal.ellip(10, .2, 75, 15900, fs=SR, output="sos"), np.tanh(dry))


dry = scene()
out = record(dry)
store_wav(out)
```